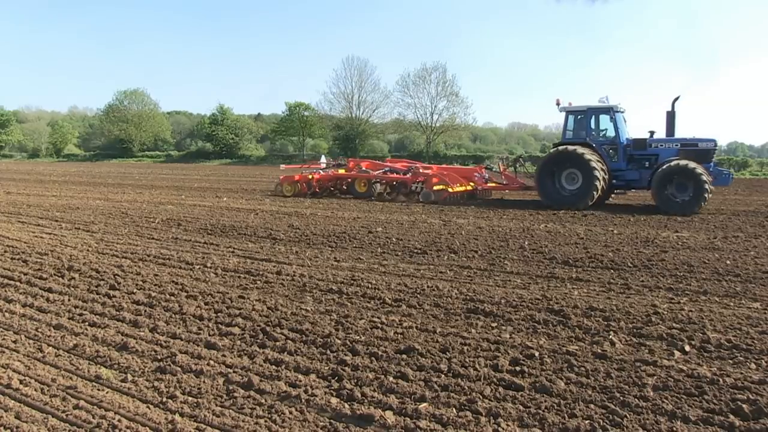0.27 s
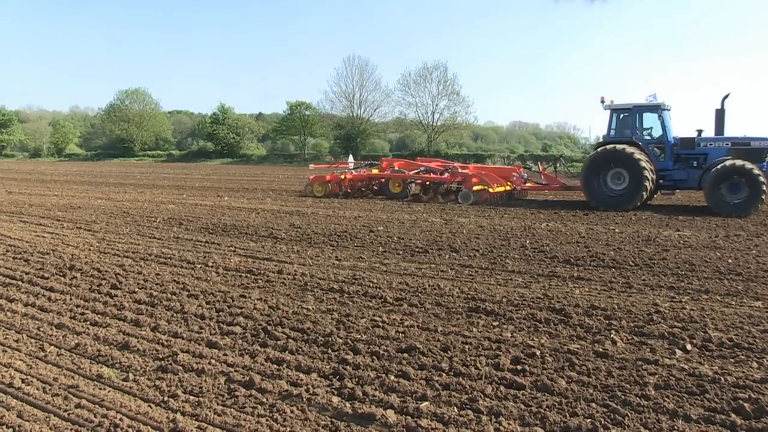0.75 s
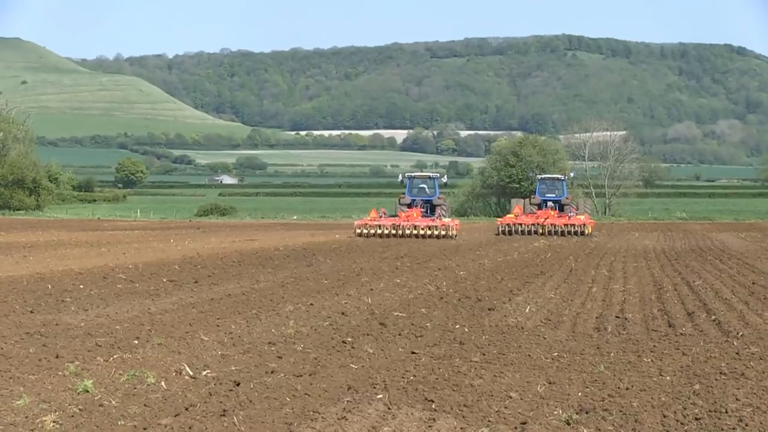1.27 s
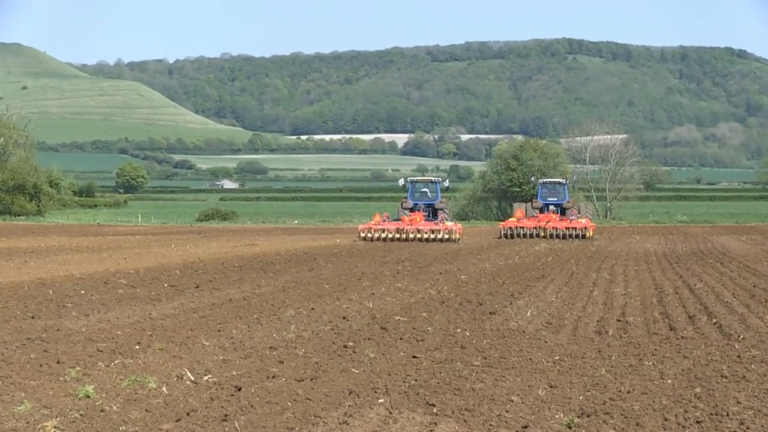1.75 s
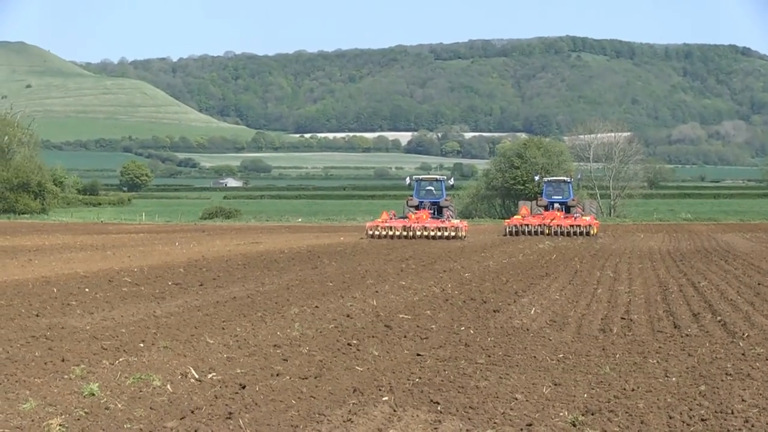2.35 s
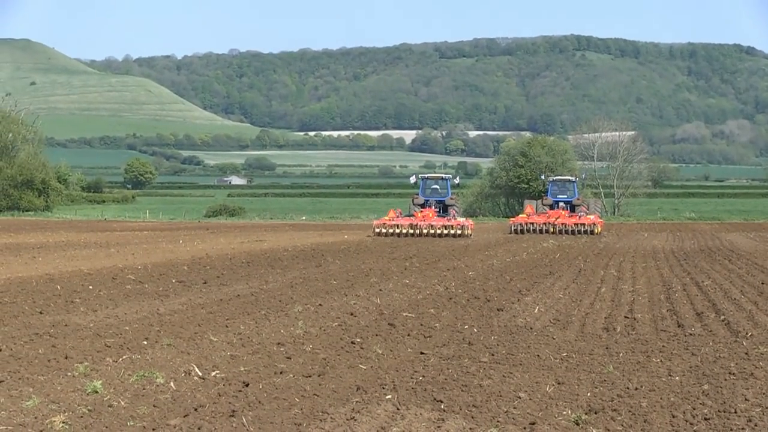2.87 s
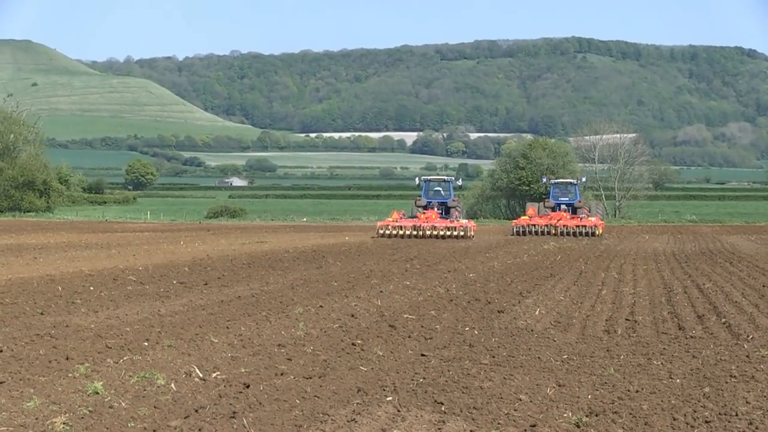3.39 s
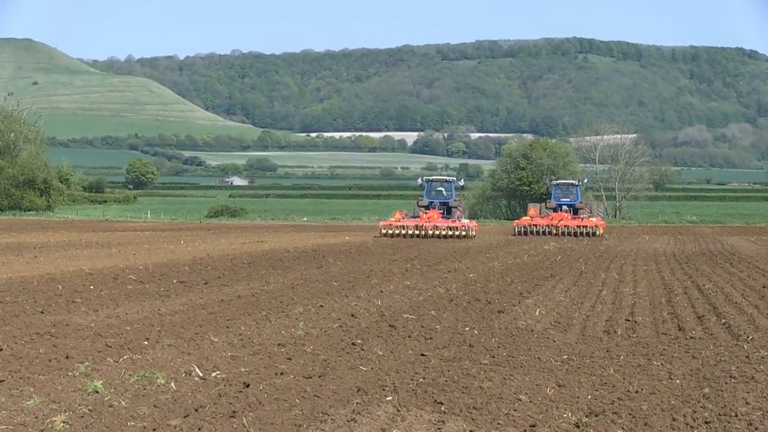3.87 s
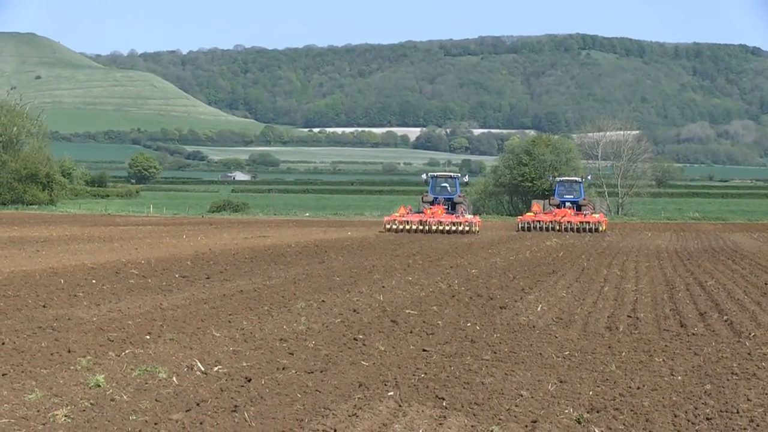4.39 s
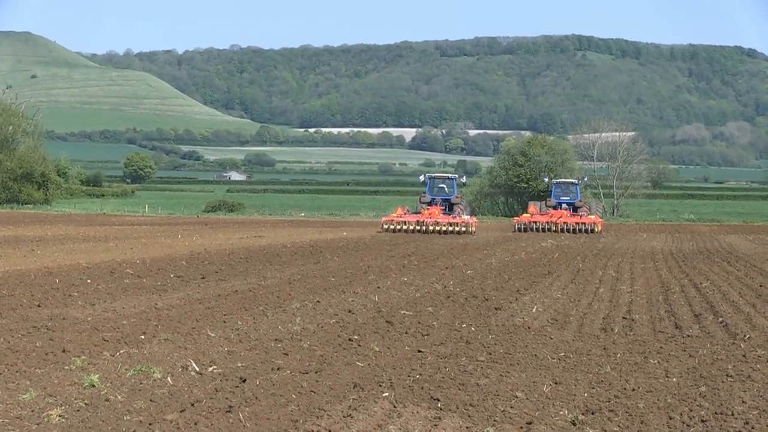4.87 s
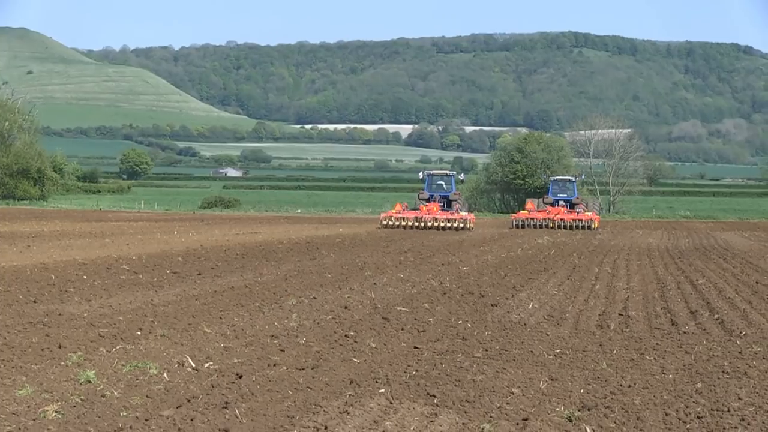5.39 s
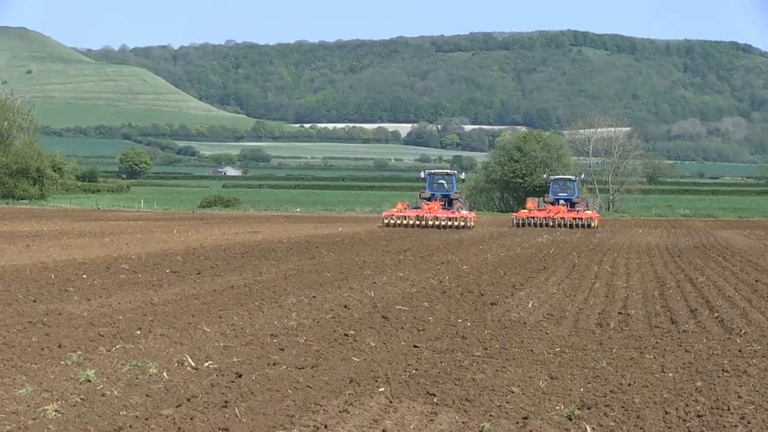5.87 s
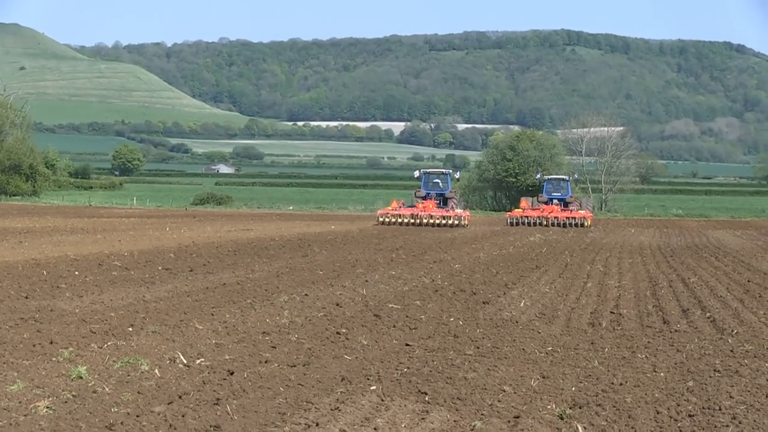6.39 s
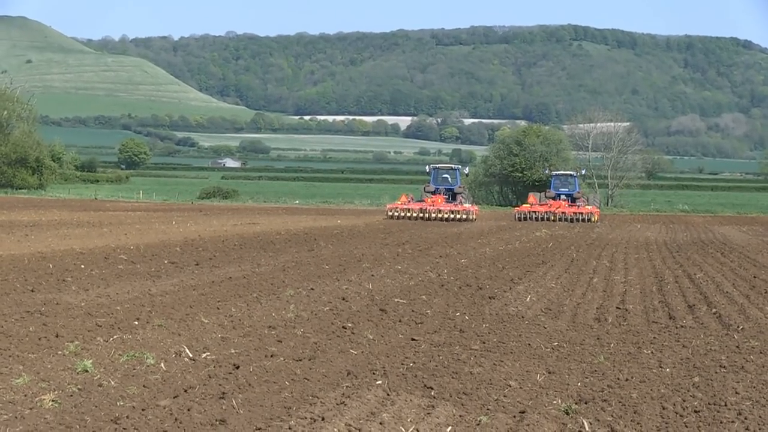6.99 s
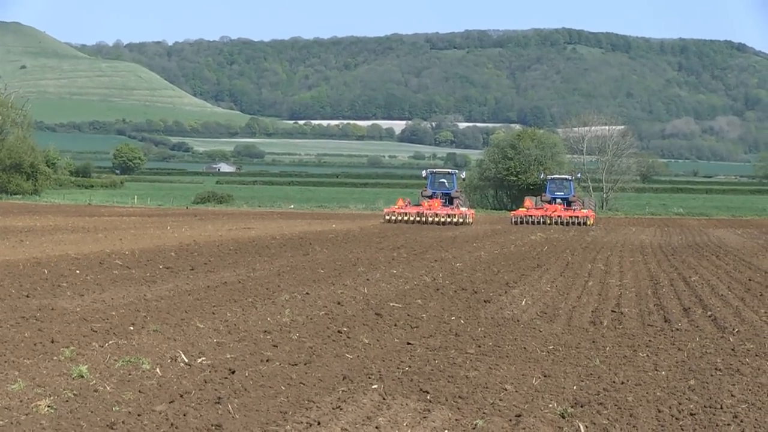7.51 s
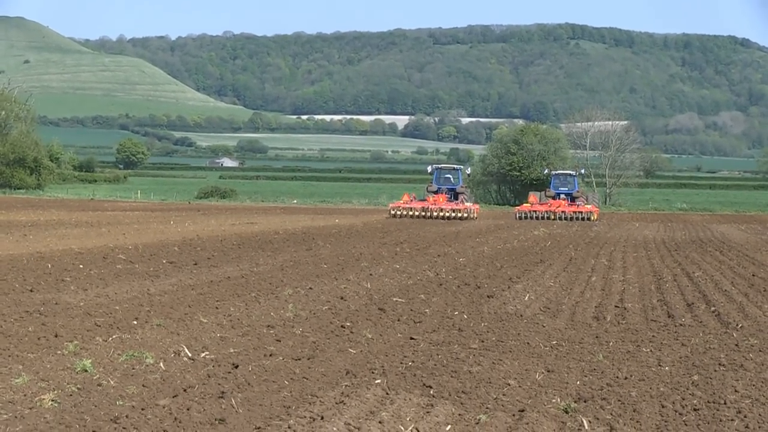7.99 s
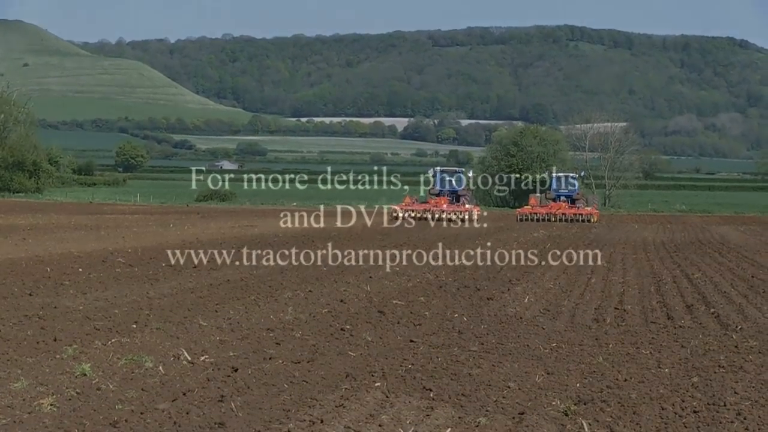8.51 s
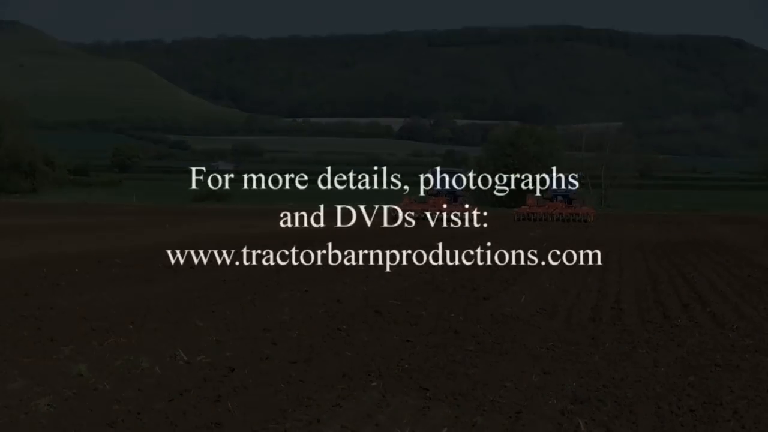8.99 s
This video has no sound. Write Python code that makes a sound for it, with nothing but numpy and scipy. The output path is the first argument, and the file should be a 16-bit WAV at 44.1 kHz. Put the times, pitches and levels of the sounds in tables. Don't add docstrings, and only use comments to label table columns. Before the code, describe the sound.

Outdoors in an open field, a big diesel tractor roars steadily close to the microphone with clatter and hissing soil. After one second it cuts hard to a far quieter, duller drone of two tractors pulling away, their low tones beating together. Faint gear whine wavers above, soft thumps bump the microphone, and everything fades to silence.

```python
import sys
import numpy as np
from scipy import signal
from scipy.fft import rfft, irfft, next_fast_len
from scipy.io import wavfile

SR = 44100
rng = np.random.default_rng(int(sys.argv[2]) if len(sys.argv) > 2 else 0)


def master_out(mix):
    frames = np.transpose(np.atleast_2d(mix))
    ceiling = np.clip(frames, -1, 1)
    pcm = np.round(ceiling * 32767).astype(np.int16)
    wavfile.write(sys.argv[1], SR, pcm)


def ratio_of_db(decibels):
    return 10 ** (np.asarray(decibels, float) / 20)


N = 407915
T = np.arange(N) / SR
CUT_S, RESUME_S = 1.0034, 1.0266
FADE_START_S, FADE_END_S = 8.25, 9.25

# cycle_multiple, level_db
NEAR_EXHAUST_ORDERS = [(1, -30.5), (2, -35), (3, -27.5), (4, -30.5), (5, -25.5), (6, 0.5), (7, -12.5),
                       (8, -22), (9, -29), (10, -20.5), (11, -26.5), (12, -20.5), (13, -30.5), (14, -23)]
# cycle_multiple, level_db
NEAR_PANEL_ORDERS = [(20, -23), (32, -14.5), (34, -14.5), (36, -20.5), (38, -19.5), (40, -11), (44, -17.5),
                     (54, -24.5), (60, -19), (124, -21.5)]
# frequency_hz, density_db (per Hz)
NEAR_SPECTRUM = [(300, -5), (453, -5.5), (535, -3), (663, 0.5), (864, -7), (1000, -5), (1820, -12.5),
                 (2110, -9.5), (3180, -17.5), (4500, -13.5), (6270, -23), (8300, -25), (10000, -35),
                 (15600, -44)]
# frequency_hz, density_db (per Hz)
NEAR_RUMBLE_SPECTRUM = [(20, -22), (55, -11), (90, -5), (130, -3), (200, -3), (265, -11), (300, -6)]
# exhaust_db, clatter_db, soil_hiss_db
NEAR_NOISE_LEVELS = (-20.1, -21.5, -27)
CYLINDER_STRENGTHS = [
    (-4.5, -7, -1.1, 2, -7.5, -1),
    (-6.5, -12.5, 0.36, -1.6, -11, 1),
    (-4.5, -2.5, 1.7, -2, -16, 1),
]

# cycle_multiple, level_db
FAR_EXHAUST_ORDERS = [(2, -33), (3, -32), (4, -26), (6, 0), (7, -19), (8, -12), (9, -19), (10, -16),
                      (12, -8), (13, -31), (14, -14), (15, -25), (16, -30), (18, -29), (20, -35), (22, -32),
                      (24, -30), (30, -29), (36, -30), (38, -30),
                      (19, -42), (21, -38), (23, -34), (25, -38), (26, -39), (27, -39), (32, -31), (40, -33),
                   (46, -31), (50, -33), (66, -35), (73, -37)]
# frequency_hz, density_db (per Hz)
FAR_SPECTRUM = [(300, -16.5), (400, -11.5), (650, -5), (900, -8), (1400, -14), (2300, -14), (3100, -21),
                (4900, -28.5), (6000, -44), (9000, -58.5)]
# frequency_hz, density_db (per Hz)
FAR_RUMBLE_SPECTRUM = [(20, -7), (45, -2), (70, -2), (110, -2), (140, -3), (170, -7), (205, -17),
                       (260, -22.5), (300, -18)]
# exhaust_db, clatter_db, soil_hiss_db
FAR_NOISE_LEVELS = (-44, -45.5, -57)
# exhaust_db, clatter_db, soil_hiss_db
FULL_LOAD_GAINS = (1.1, 2, 3)
# centre_s, load_share, half_length_s
HEAVY_SOIL = [
    (1.0, 0.94, 0.15),
    (1.65, 0.34, 0.35),
    (5.5, .3, 0.95),
    (6.2, .3, 0.37),
    (7.55, .55, 0.39),
    (8.22, 0.86, .27),
]
# firing_hz, drift_hz_per_s, level_db, drift_db_per_s
LEAD_ENGINE = (82.52, -.17, -30.9, -.1)
# firing_hz, drift_hz_per_s, level_db, drift_db_per_s
BEATING_ENGINES = [
    (92.9, .03, -37.3, -.3),
    (95.1, -.01, -38.2, -.45),
]
# pitch_hz, drift_hz_per_s, level_db, drift_db_per_s
SLOWING_ENGINE = (145.6, -1.4, -48.5, -.5)
# lead_hz, lower_hz, upper_hz
GOVERNOR_HUNTING = (.04, .25, .12)
# lower_db, upper_db
BEATING_OCTAVES = (-21, -40)
# pitch_ratio, level_db
SLOWING_PARTIALS = [(1, -0.5), (.8996, -1.5), (0.83, -6.5)]
# pitch_hz, level_db
SHAFT_TONES = [(36.7, -60), (73.35, -51.5), (105.3, -51), (157.5, -58), (200.5, -67)]
# pitch_ratio, level_db, strongest_s
MESH_COMPANIONS = [(0.2559, -59, 4.0), (0.4448, -59, 3.0), (0.819, -58, 3.4), (1.0176, -58, 6.8),
                   (1.085, -60, 6.7)]
# centre_s, level_db, half_length_s
MESH_SWELLS = [(2.093, -53, 0.18), (2.7, -54.5, 0.35), (3.397, -49, 0.26), (3.95, -43.5, 0.27),
               (4.5, -48.5, 0.31), (5.15, -51, .2), (5.65, -53, .15), (6.1, -54.5, .15), (6.5, -54, 0.12),
               (7.45, -52.5, 0.13), (8.15, -53, .35), (9.08, -48.5, 0.12)]

# frequency_hz, density_db (per Hz)
RUSTLE_SPECTRUM = [(5500, 4.5), (6500, 0), (8000, -8), (11000, -23)]
# centre_s, level_db, half_length_s
STUBBLE_GUSTS = [
    (1.03, -58, 0.045),
    (1.2, -61, 0.096),
    (2.196, -77, 0.32),
    (3.05, -70, .25),
    (4.8, -79, .2),
    (5.9, -80, .4),
]
# start_s, peak_db, pitch_hz
STAND_KNOCKS = [
    (1.115, -22, 54.5),
    (3.25, -33, 35),
    (5.5, -36, 38),
    (6.915, -26, 54.7),
]
# start_s, peak_db, pitch_hz
HOUSING_TICKS = [(1.19, -66, 8500), (2.1804, -64.5, 11000), (2.376, -57.5, 13600), (2.391, -68, 9000),
                 (3.1427, -59.5, 12600), (3.152, -60, 9500), (3.158, -56.5, 14000), (3.2265, -58, 14070),
                 (3.239, -63.5, 13500), (3.267, -62, 11000), (3.270, -62, 13600), (3.4156, -56.5, 13300),
                 (4.0721, -52, 13200), (4.085, -67, 9000), (4.092, -64, 11000), (4.093, -64, 13500)]
# start_s, length_s, from_hz, to_hz, level_db
BIRD_CALL = (3.436, .035, 6200, 4100, -53.5)


def rms_one(x):
    return x / np.sqrt(np.mean(x ** 2) + 1e-20)


def drift(rate):
    pole = np.exp(-80 * np.pi * rate / SR)
    noise = rng.standard_normal(N // 40 + 2002)
    slow = signal.lfilter([1], [1, -2 * pole, pole * pole], noise)[2000:]
    return np.interp(np.arange(N) / 40, np.arange(len(slow)), rms_one(slow))


def turns(hz):
    return 2 * np.pi * np.cumsum(hz * np.ones(N)) / SR


def tone(phase, db, flutter_db, rate):
    return np.sqrt(2) * ratio_of_db(db + flutter_db * drift(rate)) * np.cos(phase)


def band_noise(colour, low, high, patchy_db):
    size = next_fast_len(N)
    hz = np.maximum(np.arange(size // 2 + 1) * SR / size, 1)
    points = np.array(colour)
    shape_db = np.interp(np.log(hz), np.log(points[:, 0]), points[:, 1])
    shaped = rfft(rng.standard_normal(size)) * ratio_of_db(shape_db)
    edges = np.geomspace(low, high, 5)
    together = drift(3.8)
    out = 0
    for a, b in zip(edges, edges[1:]):
        strip = irfft(shaped * (hz >= a) * (hz < b), size)[:N]
        out = out + strip * ratio_of_db(patchy_db * (together + drift(7.8)))
    return rms_one(out)


def exhaust_tones(cycle, firing_db, orders, flutter_db, rate):
    pipe_lag_rad = .235
    out = 0
    for k, db in orders:
        slip = 0
        if k > 15 and k % 6:
            slip = rng.uniform(0, 2 * np.pi) + 1.2 * drift(.5)
        flutter = flutter_db * min(1, (1.5 - db) / 12)
        out = out + tone(k * cycle - pipe_lag_rad * k ** 2 + slip, firing_db + db, flutter, rate)
    return out


def engine_noise(cycle, levels, colour, burst, patchy_db):
    firing = 6 * cycle / (2 * np.pi) - 4.36
    cylinder = np.floor(firing).astype(int) % 6
    shape = np.exp(2.2 * (np.cos(2 * np.pi * (firing - .5)) - 1))
    edges = [300, 1300, 3500, 15700]   # exhaust, clatter, soil hiss (Hz)
    out = np.zeros(N)
    for low, high, db, pattern in zip(edges, edges[1:], levels, CYLINDER_STRENGTHS):
        gate = rms_one(1 + burst * shape * ratio_of_db(np.array(pattern)[cylinder]))
        out += ratio_of_db(db) * gate * band_noise(colour, low, high, patchy_db)
    return out


def near_tractor():
    firing_hz, firing_db = 101.89, -19.9
    cycle = turns(firing_hz / 6)
    tones = exhaust_tones(cycle, firing_db, NEAR_EXHAUST_ORDERS, flutter_db=1.0, rate=4.0)
    panels = exhaust_tones(cycle, firing_db, NEAR_PANEL_ORDERS, flutter_db=2.2, rate=5.0)
    rumble = ratio_of_db(-29) * band_noise(NEAR_RUMBLE_SPECTRUM, 20, 300, patchy_db=-0.3)
    noise = engine_noise(cycle, NEAR_NOISE_LEVELS, NEAR_SPECTRUM, burst=0.55, patchy_db=0.32)
    return tones + panels + rumble + noise


def change_scene(near, far):
    ramp_s, remnant_s, entry_s = .0008, .009, .002
    since = np.maximum(T - CUT_S, 0)
    gap = (T < RESUME_S) * np.clip(1 + (T - CUT_S) / ramp_s, 0, 1)
    dull = signal.sosfilt(signal.butter(2, [400, 2500], "band", fs=SR, output="sos"), near)
    remnant = dull * ratio_of_db(-23) * np.clip(1 - since / remnant_s, 0, 1)
    settling = 0.067 * np.exp(-since / 0.0053) - .006
    leaving = np.clip((CUT_S - T) / ramp_s, 0, 1)
    entry = (T >= RESUME_S) * np.clip(.5 + (T - RESUME_S) / entry_s, 0, 1)
    return near * leaving + (remnant + settling) * gap + far * entry


def in_time(hz, hz_per_s, db, db_per_s):
    since = T - RESUME_S
    return hz + hz_per_s * since, db + db_per_s * since


def swells(rows):
    return sum(top * np.exp(-((T - s) / half) ** 2) for s, top, half in rows)


def swelling(bed_db, rows):
    return ratio_of_db(bed_db) + swells([(s, ratio_of_db(db), half) for s, db, half in rows])


def far_lead():
    hz, db = in_time(*LEAD_ENGINE)
    cycle = turns((hz + GOVERNOR_HUNTING[0] * drift(.5)) / 6)
    tones = exhaust_tones(cycle, db, FAR_EXHAUST_ORDERS, flutter_db=.8, rate=1.5)
    rumble = ratio_of_db(-43) * band_noise(FAR_RUMBLE_SPECTRUM, 23, 300, patchy_db=0.8)
    load = swells(HEAVY_SOIL)
    levels = [base_db + gain_db * load for base_db, gain_db in zip(FAR_NOISE_LEVELS, FULL_LOAD_GAINS)]
    roar = engine_noise(cycle, levels, FAR_SPECTRUM, burst=0.67, patchy_db=0.27)
    return tones + rumble + roar


def beating_engines():
    out = 0
    for engine, hunting_hz, octave_db in zip(BEATING_ENGINES, GOVERNOR_HUNTING[1:], BEATING_OCTAVES):
        hz, db = in_time(*engine)
        phase = turns(hz + hunting_hz * drift(.5))
        out = out + tone(phase, db, .9, 1.0) + tone(2 * phase, db + octave_db, 1.5, 1.0)
    return out


def slowing_machine():
    hz, db = in_time(*SLOWING_ENGINE)
    return sum(tone(turns(hz * ratio), db + rel_db, 1.8, .6) for ratio, rel_db in SLOWING_PARTIALS)


def shafts():
    return sum(tone(turns(hz), db, 1.5, 1.2) for hz, db in SHAFT_TONES)


def gear_whine():
    mesh_rise = swells([(3.7, 9.0, .9)])
    hz = 2452 - .4 * (T - RESUME_S) + mesh_rise + 4.04 * drift(6.3)
    out = swelling(-61, MESH_SWELLS) * tone(turns(hz), -2.5, 2.2, 18.0)
    for ratio, top_db, at in MESH_COMPANIONS:
        out = out + tone(turns(hz * ratio), top_db - 1.0 * np.abs(T - at), 2.9, 10.0)
    return out


def turbo_breath():
    centre_hz, width_hz = 4710, 300
    edges = [centre_hz - width_hz / 2, centre_hz + width_hz / 2]
    duct = signal.butter(2, edges, "band", fs=SR, output="sos")
    breath = signal.sosfilt(duct, rng.standard_normal(N))
    boost_db = -68 + 12 * swells(HEAVY_SOIL) + 1.2 * drift(8.0)
    return ratio_of_db(boost_db - 2) * rms_one(breath)


def stubble_rustle():
    rustle = band_noise(RUSTLE_SPECTRUM, 5500, 11000, patchy_db=0.9)
    return ratio_of_db(-5) * swelling(-69 - 0.4 * T, STUBBLE_GUSTS) * rustle


def microphone_hiss():
    return ratio_of_db(-77.5) * rng.standard_normal(N)


def bursts(events, cycles, rise):
    out = np.zeros(N)
    for s, db, hz in events:
        c = np.arange(int(6 * cycles * SR / hz)) * hz / SR
        ring = (1 - np.exp(-c / rise)) * np.exp(-c / cycles) * np.sin(2 * np.pi * c)
        i = round(s * SR)
        out[i:i + len(c)] += ratio_of_db(db) * ring / np.max(np.abs(ring))
    return out


def stand_bumps():
    return bursts(STAND_KNOCKS, cycles=0.98, rise=0.35)


def creaks():
    band = signal.butter(2, [9500, 14500], "band", fs=SR, output="sos")
    scratch = signal.sosfilt(band, rng.standard_normal(N))
    marks = np.zeros(N)
    marks[[round(s * SR) for s, db, hz in HOUSING_TICKS]] = ratio_of_db(np.array(HOUSING_TICKS)[:, 1] - 3)
    decay = np.exp(-1 / (.003 * SR))
    envelope = signal.lfilter([1], [1, -decay], marks + 1e-18)
    return bursts(HOUSING_TICKS, cycles=45.0, rise=6.0) * ratio_of_db(-9) + scratch * envelope


def bird():
    s, length, from_hz, to_hz, db = BIRD_CALL
    u = np.clip((T - s) / length, 0, 1)
    hz = to_hz + (from_hz - to_hz) * np.exp(-4.0 * u)
    return ratio_of_db(db) * np.sin(np.pi * u ** 0.82) * np.sin(turns(hz))


def closing_fade():
    fade = np.clip((FADE_END_S - T) / (FADE_END_S - FADE_START_S), 1e-4, 1)
    return fade * np.clip((FADE_END_S - T) / 0.04, 0, 1)


def scene():
    engines = far_lead() + beating_engines() + slowing_machine() + shafts() + gear_whine()
    air = turbo_breath() + stubble_rustle() + microphone_hiss()
    far = engines + air + stand_bumps() + creaks() + bird()
    return np.tile(change_scene(near_tractor(), far) * closing_fade(), (2, 1))


def top_cut(x):
    return signal.sosfilt(signal.butter(12, 15700, fs=SR, output="sos"), x)


def record(dry):
    headroom = .95
    return top_cut(headroom * np.tanh(dry / headroom))


dry = scene()
out = record(dry)
master_out(out)
```